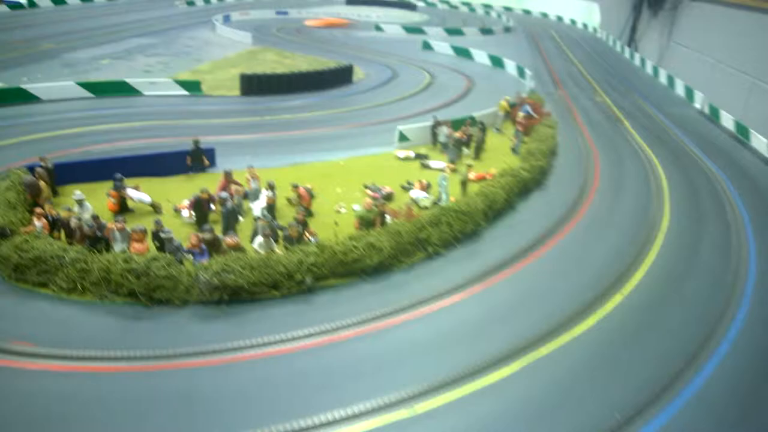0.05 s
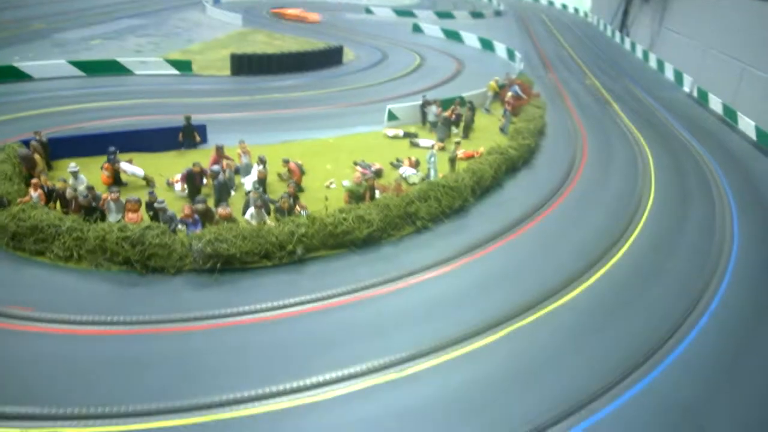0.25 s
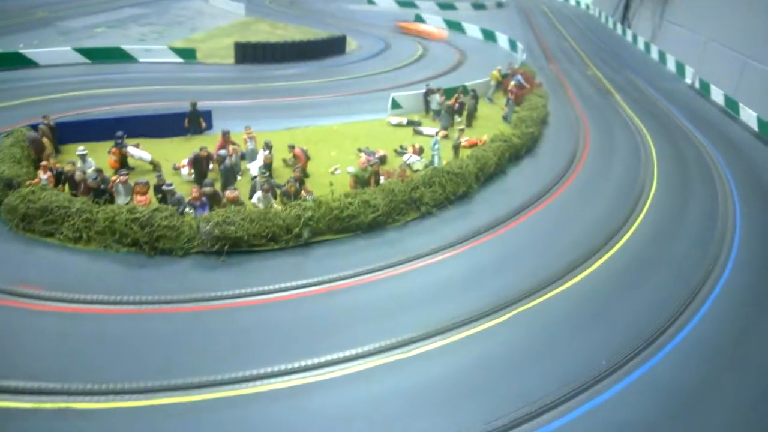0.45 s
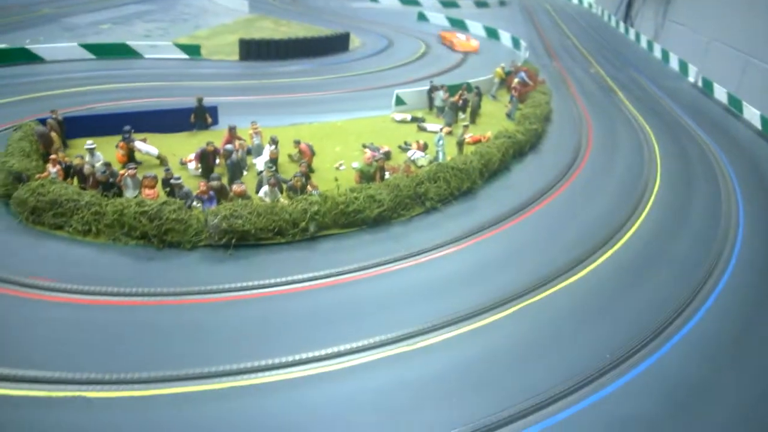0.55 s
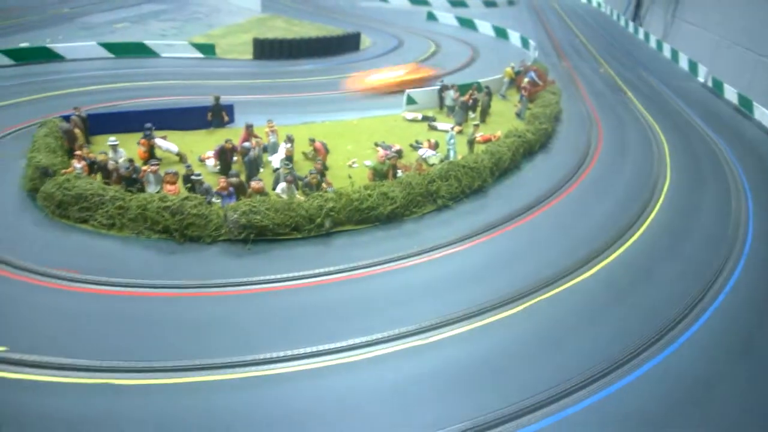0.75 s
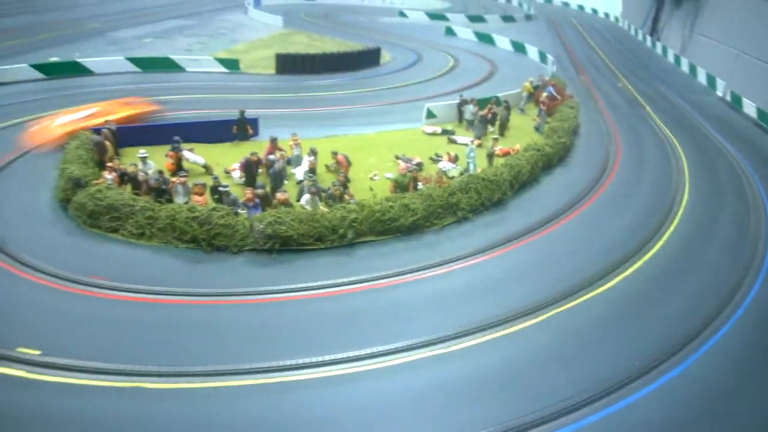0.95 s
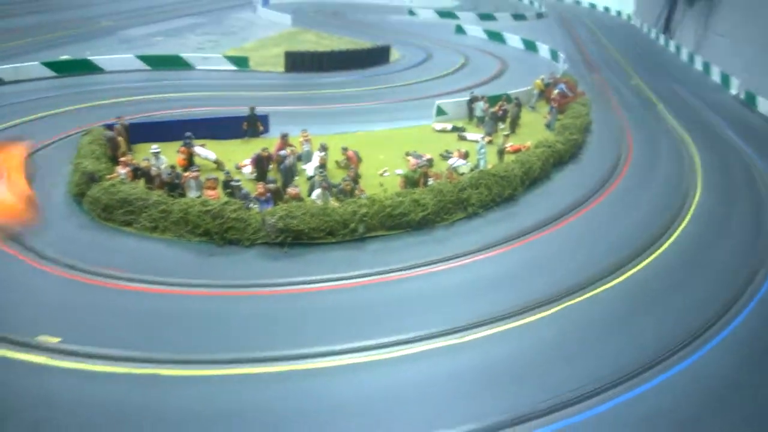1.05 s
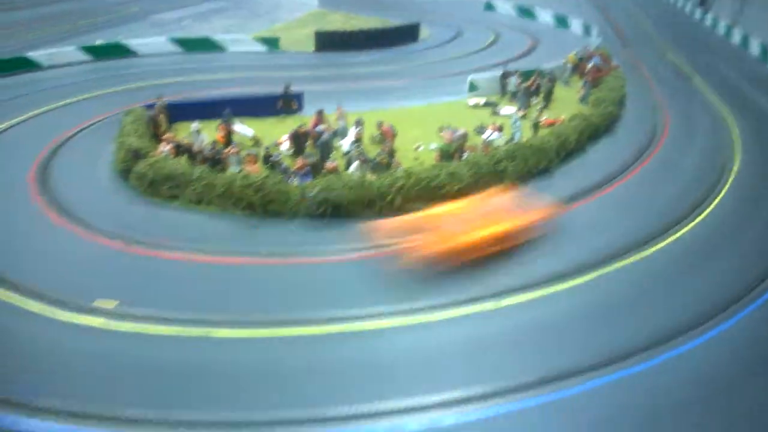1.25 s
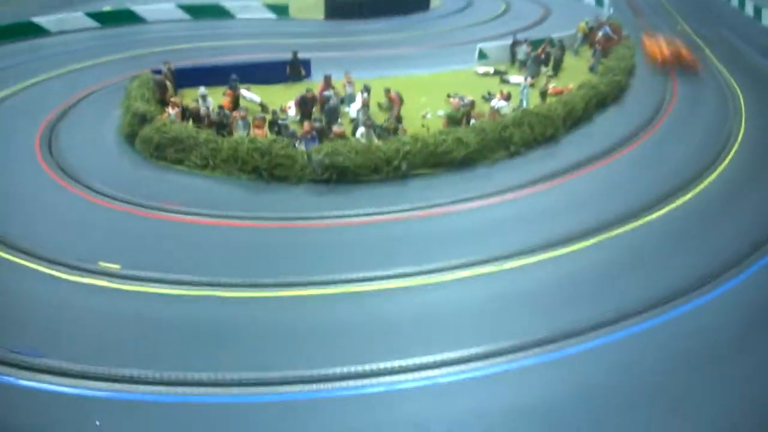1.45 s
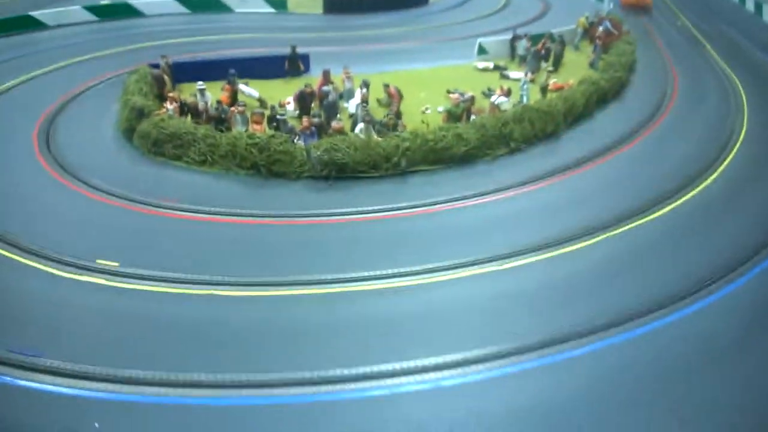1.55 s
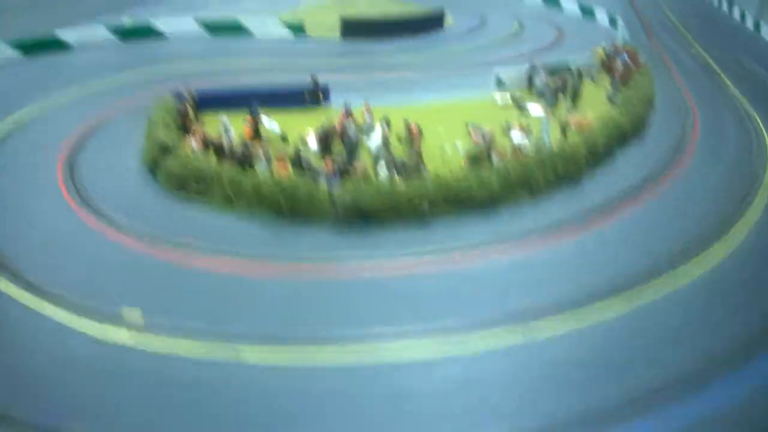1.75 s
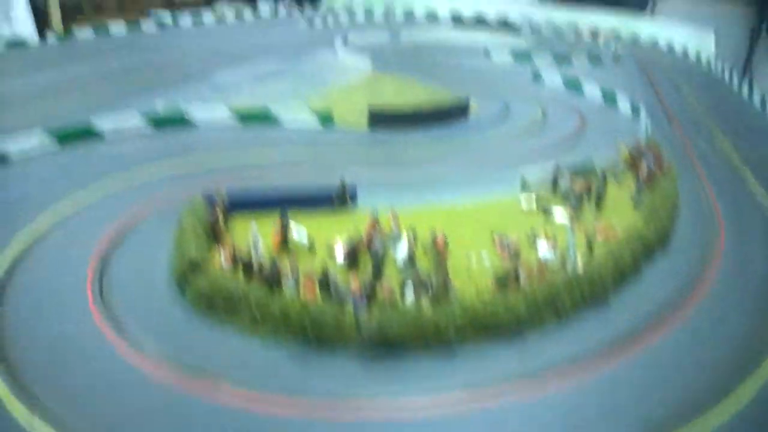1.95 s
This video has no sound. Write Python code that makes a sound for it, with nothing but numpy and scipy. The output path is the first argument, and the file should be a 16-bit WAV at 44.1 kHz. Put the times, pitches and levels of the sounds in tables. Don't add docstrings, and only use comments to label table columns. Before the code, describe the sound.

A toy slot car whirs around a model track in a hall, dry rasp and joint knocks first, then a rising gear whine rushing close past a single mono microphone before dropping away over faint ventilation hum.

```python
import sys
import numpy as np
from scipy import signal
from scipy.fft import rfft, irfft
from scipy.io import wavfile
from scipy.ndimage import uniform_filter1d

SR = 44100
rng = np.random.default_rng(int(sys.argv[2]) if len(sys.argv) > 2 else 0)


def transcribe(u):
    v = np.clip(np.atleast_2d(u).T, -1, 1)
    q = np.round(v * 32767).astype(np.int16)
    wavfile.write(sys.argv[1], SR, q)


def invert_db(x):
    u = np.asarray(x, float) / 20
    return 10 ** u


N = 88200

# (time [s], mesh rate [Hz], whine [dB], overtones [dB], blur [Hz])
GEAR_MESH = [(0, 1550, -56, -64, 350), (.31, 1720, -47, -62, 300), (.4, 1285, -62, -45, 40),
             (.5, 1080, -52, -62, 50), (.555, 980, -64, -64, 50), (.61, 1070, -47, -42, 60),
             (.7, 1290, -47, -44, 70), (.88, 1450, -47, -46, 50), (.9, 1100, -51, -56, 90),
             (.98, 1060, -47, -44, 70), (1.05, 1290, -44, -44, 60), (1.18, 1380, -41, -42, 90),
             (1.36, 1720, -36, -46, 220), (1.47, 2100, -40, -50, 150), (1.67, 3200, -46, -56, 120),
             (1.685, 2660, -41, -58, 150), (1.78, 2105, -53, -52, 75), (2, 2030, -53, -46, 45)]
# (multiple, level [dB])
OVERTONES = [(2, 5), (3, -1.5), (4, -4.5), (5, -7), (6, -4)]
# (pitch [Hz], width [Hz], level [dB])
GEAR_PANELS = [(2200, 120, -13), (3400, 300, 0), (4150, 150, -4), (5150, 250, -3), (6750, 550, 0)]
# (time [s], nearness [dB], facing the microphone [dB], tyre slide [dB])
PASS_BY = [(0, -38, -8.5, -4.5), (.13, -45.5, -5, 4), (.22, -41, -10.5, -1), (.41, -41, -3.5, 4),
           (.455, -47, -2, -1), (.575, -48.5, 4.5, -2.5), (.62, -39, -7, 0.5), (.78, -40.5, -2, 1),
           (.84, -44.5, 13, 7), (.89, -44, 0, 4), (.96, -45.5, -2, 7.5), (1.08, -34.5, -19, 4),
           (1.18, -34.5, -4, 8), (1.3, -29, 2, -2.5), (1.4, -24.5, -12, -2.5), (1.62, -31.5, -10.5, -0.5),
           (1.7, -39.5, -7, 2), (1.79, -41.5, -1.5, -3.5)]
# (pitch [Hz], width [Hz], level [dB])
SHELL_MODES = [(3594, 1070, 2.5), (6400, 1100, 4.5), (9050, 570, -5), (10630, 230, -20),
               (12600, 270, -11.5)]
# (frequency [Hz], density [dB per Hz])
BRAID_FIZZ = [(6000, -12.5), (8000, -2.5), (9000, -6), (10200, -0.5), (12000, 5), (13300, 5.5), (14500, 8),
              (15700, -3.5)]
# (frequency [Hz], density [dB per Hz])
TYRE_RASP = [(200, -13), (700, -17.5), (1100, -1), (1750, 4.5), (2750, -1), (5100, 4), (8000, 1),
             (16000, -18.5)]
# (frequency [Hz], density [dB per Hz])
BOARD_ROLL = [(50, -21), (100, 4), (180, -3.5), (350, -7.5), (800, -12), (1500, -14), (3000, -13.5),
              (6000, -20)]
# (time [s], level [dB])
RUMBLE_SWELL = [(0, 0), (.2, 1.5), (.35, 3.5), (.5, -3), (.65, 5), (.83, -3), (1.1, 3), (1.35, 1), (1.6, 3),
                (1.85, 0.5), (2, -4)]
# (time [s], pitch ratio)
SHELL_TWIST = [(0, 0.99), (.45, 1.024), (.6, 0.98), (.84, 1.02), (1.1, 1.033), (1.3, 1.03), (1.62, 0.98),
               (1.72, 1.065), (2, 0.95)]
# (time [s], loss [dB], length [s])
LULLS = [(0.132, -1.5, 0.039), (0.203, -7, .03), (0.465, -7.5, 0.038), (0.533, -10, .02),
         (0.886, -2, 0.1), (1.658, -6.5, .03), (1.75, -6, 0.1), (1.862, -2, .13)]
# (time [s], level [dB], length [s])
JOINT_RATTLES = [(0.03, -40, 0.033), (0.188, -38, 0.024), (0.2357, -37, 0.013), (0.29, -33.5, 0.011),
                 (0.331, -39, 0.025), (0.374, -42.5, 0.011), (0.542, -57, 0.0074), (0.598, -42, 0.018),
                 (0.816, -48, .02), (1.033, -38, 0.031), (1.295, -28, 0.0065), (1.389, -30, 0.009),
                 (1.43, -28, 0.011), (1.49, -27, 0.013), (1.52, -31.5, 0.011), (1.751, -38.5, 0.03)]
# (time [s], level
# [dB], length [s], pitch [Hz])
BRIEF_RINGS = [(.033, -49, 0.022, 6500), (.14, -46, 0.027, 3840), (.192, -50, 0.017, 1860),
               (.2354, -41.5, 0.023, 1740), (.236, -40.5, 0.015, 7000), (.2927, -39.5, 0.0079, 1710),
               (.293, -42, 0.0074, 3900), (.3326, -41, 0.021, 1650), (.333, -45, 0.016, 6080),
               (.373, -42.5, 0.019, 3240), (.39, -50.5, 0.088, 5100), (.4, -48, 0.02, 3900),
               (.4, -48, 0.058, 6400), (.475, -47, .02, 6600), (.49, -57, 0.041, 3500),
               (.554, -50, 0.053, 6390), (.555, -54, 0.024, 11000), (.602, -43.5, .045, 3290),
               (.6085, -42, .015, 6290), (.675, -40, 0.026, 6550), (.71, -43.5, 0.063, 6550),
               (.805, -38, 0.016, 6930), (.825, -43.5, 0.051, 7050), (.98, -53, 0.041, 6800),
               (1.05, -37, 0.047, 6750), (1.085, -36, 0.022, 3800), (1.165, -36, 0.014, 3850),
               (1.17, -33.5, 0.017, 5200), (1.21, -33, 0.018, 4000), (1.217, -29.5, 0.037, 6600),
               (1.25, -36.5, 0.022, 7500), (1.255, -32, 0.028, 6000), (1.27, -38, 0.027, 4250),
               (1.297, -28, 0.016, 11500), (1.298, -33, 0.019, 6500), (1.318, -31, 0.017, 6200),
               (1.343, -34, 0.02, 3500), (1.382, -28, 0.0083, 3700), (1.413, -32, 0.013, 3950),
               (1.44, -28.5, 0.029, 6400), (1.483, -25.5, 0.015, 6450), (1.507, -39.5, 0.022, 2950),
               (1.535, -43, .03, 6300), (1.555, -37, 0.055, 3290), (1.57, -38, 0.024, 2650),
               (1.6, -39.5, 0.047, 5950), (1.625, -40.5, 0.06, 3180), (1.72, -43.5, 0.055, 3600),
               (1.76, -39.5, .025, 6300), (1.79, -53.5, 0.23, 3400)]
# (time [s], level [dB], pitch [Hz], length [s])
BOARD_THUMPS = [(0.041, -48.5, 172, 0.045), (0.218, -48.5, 112, 0.12), (0.334, -46.5, 610, 0.11),
                (0.352, -40.5, 147, 0.088), (0.381, -38, 265, 0.028), (0.384, -43.5, 1040, 0.026),
                (0.4, -50, 159, 0.064), (0.593, -57, 203, 0.14), (0.708, -48.5, 95, 0.081),
                (0.903, -48.5, 1010, 0.058), (1.468, -62, 130, 0.07), (1.541, -42.5, 264, 0.043),
                (1.575, -40, 830, 0.034), (1.501, -48.5, 804, 0.08), (1.603, -52, 298, 0.12),
                (1.675, -36.5, 1500, 0.016), (1.688, -42, 1130, 0.047), (1.698, -43, 142, 0.062),
                (1.727, -45.5, 340, 0.047)]
# (time [s], level [dB], length [s], pitch [Hz])
CHASSIS_DRONES = [(.64, -45.5, 0.14, 3590), (0.967, -46, 0.14, 2270), (1.098, -42.5, 0.13, 2620),
                  (1.203, -39.5, 0.13, 1580), (1.327, -34, 0.18, 3610), (1.617, -40, 0.043, 3180)]
# (pitch [Hz], level [dB], phase [turns])
VENT_HUM = [
    (41.8, -45.5, 0.61),
    (63, -62, 0.25),
    (123, -67.5, 0.041),
]
# (frequency [Hz], density [dB per Hz])
HALL_AIR = [(22, 8), (33, 8), (60, -6), (150, -10), (700, -24), (2000, -36), (6300, -40), (16000, -52)]


def curve(table, count):
    rows = np.array(table)
    return np.interp(np.arange(N) / SR, rows[:, 0], rows[:, count])


def evened(x):
    return x / np.sqrt(np.mean(x ** 2) + 1e-20)


def coloured(x, points):
    hz = np.fft.rfftfreq(N, 1 / SR)
    f, db = np.transpose(points)
    gain = invert_db(np.interp(np.log(hz + 1), np.log(f + 1), db))
    return evened(irfft(rfft(x) * gain, N))


def drift(size):
    smooth = uniform_filter1d(rng.standard_normal(N), size)
    return evened(uniform_filter1d(smooth, size))


def resonate(x, hz, width):
    turn = np.exp(2j * np.pi * np.cumsum(hz * np.ones(len(x))) / SR)
    r = np.exp(-np.pi * abs(width) / SR)
    return 2 * (turn * signal.lfilter([(1 - r) ** 2], [1, -2 * r, r * r], x / turn)).real


def burst(start, length):
    u = (np.arange(N) / SR - start) / length
    return np.clip(u * 8, 0, 1) * np.exp(-2.5 * np.clip(u - .5, 0, 50))


def whine():
    teeth, wobble, clean = 10, .4, .25
    whine_db, chatter_db, skip_db = -2, 3.5, 4
    hz = curve(GEAR_MESH, count=1)
    blur = abs(curve(GEAR_MESH, count=4))
    turns = np.cumsum(hz * (1 + 0.0065 * drift(size=150))) / SR
    out = np.zeros(N)
    for order, db in [(1, 0), *OVERTONES]:
        k = round(order)
        jitter = np.cumsum(.5 * blur * drift(size=80)) / SR
        fuzzy = np.sqrt(2) * np.cos(2 * np.pi * k * (turns + jitter))
        fuzzy = fuzzy * invert_db(chatter_db * drift(size=250))
        line = np.sqrt(2) * np.cos(2 * np.pi * k * turns) * invert_db(skip_db * drift(size=600))
        line = line * np.minimum(50 / blur, 1) ** 2
        if k == 1:
            gain = invert_db(curve(GEAR_MESH, count=2))
        else:
            shell = sum(invert_db(d) / (1 + (2 * (k * hz - f) / (2.8 * w)) ** 4) for f, w, d in GEAR_PANELS)
            gain = invert_db(db + curve(GEAR_MESH, count=3)) * shell
        out += gain * (clean * line + (1 - clean) * fuzzy)
    return invert_db(whine_db) * out * (1 + wobble * np.cos(2 * np.pi * turns / teeth))


def rasp():
    slide_db, shell_db, fizz_db, rumble_db = -6, -7.5, 0.5, -50.5
    grit_per_s, grit_db, wander_hz = 2500, 3, 130
    flutter_db, patch_db, lumps_db = 1.4, 1, 1.5
    lull_share = 0.38

    grit = invert_db(grit_db * np.minimum(rng.exponential(1, N), 3)) * (rng.random(N) < grit_per_s / SR)
    grains = evened(grit * rng.standard_normal(N))
    drive = evened(grains + 2.3 * rng.standard_normal(N))

    level = invert_db(curve(PASS_BY, count=1) + lull_share * lull_loss() + flutter_db * drift(size=250))
    jolts = sum((invert_db(db) * burst(s, n)) ** 2 for s, db, n in JOINT_RATTLES)
    level = np.sqrt(level ** 2 + jolts)

    twist = curve(SHELL_TWIST, count=1)
    ring = np.zeros(N)
    for f, width, db in SHELL_MODES:
        mode = evened(resonate(drive, f * twist + wander_hz * drift(size=700), width))
        ring += invert_db(db + patch_db * drift(size=400)) * mode
    shell = invert_db(shell_db) * evened(ring)
    fizz = invert_db(fizz_db + curve(PASS_BY, count=2)) * coloured(drive, BRAID_FIZZ)
    slide = invert_db(slide_db + curve(PASS_BY, count=3)) * coloured(drive, TYRE_RASP)

    rumble_level = invert_db(rumble_db + curve(RUMBLE_SWELL, count=1) + lumps_db * drift(size=1500))
    rumble = rumble_level * coloured(rng.standard_normal(N), BOARD_ROLL)
    return mottled(level * (shell + slide + fizz)) + rumble


def lull_loss():
    t = np.arange(N) / SR
    edge_s = 0.0032
    return sum(db * np.clip(np.minimum(t - s, s + n - t) / edge_s, 0, 1) for s, db, n in LULLS)


def mottled(x):
    dull_hz, dull_share, mottle_db = 12500, 0.99, 2
    hz, t, z = signal.stft(x, SR, nperseg=512, noverlap=384)
    patches = uniform_filter1d(rng.standard_normal(z.shape), size=6, axis=0)
    patches = evened(uniform_filter1d(patches, size=14, axis=1))
    seconds = np.arange(N) / SR
    near_db = np.interp(t, seconds, curve(PASS_BY, count=1)) + 36
    loss_db = dull_share * np.minimum(near_db, 0) + np.interp(t, seconds, lull_loss())
    dull_db = loss_db / (1 + (dull_hz / (hz[:, None] + 1)) ** 16)
    return signal.istft(z * invert_db(mottle_db * patches + dull_db), SR, nperseg=512, noverlap=384)[1][:N]


def rings():
    ring_db, width_hz, pure, waver_hz = 4.5, 480, .55, 60
    noise = rng.standard_normal(N)
    waver = waver_hz * drift(size=120)
    out = np.zeros(N)
    for s, db, n, hz in BRIEF_RINGS:
        part = slice(round(s * SR), min(round((s + 4 * n) * SR), N))
        tone = np.sqrt(2) * np.sin(2 * np.pi * np.cumsum(hz + waver[part]) / SR)
        fuzz = evened(resonate(noise[part], hz, width_hz))
        out[part] += invert_db(db + ring_db) * burst(s, n)[part] * (pure * tone + (1 - pure) * fuzz)
    return out


def thumps():
    noise = rng.standard_normal(N)
    return sum(invert_db(db) * burst(s, n) * evened(resonate(noise, hz, 0.94 * hz))
               for s, db, hz, n in BOARD_THUMPS)


def drones():
    noise = rng.standard_normal(N)
    q = 7.6
    return sum(invert_db(db) * burst(s, n) * evened(resonate(noise, hz, hz / q))
               for s, db, n, hz in CHASSIS_DRONES)


def room(x):
    t60_s, top_hz = .18, 6000
    t = np.arange(SR // 2) / SR
    tail = rng.standard_normal(len(t)) * invert_db(-60 * t / t60_s) * (t > .006)
    tail = signal.lfilter(*signal.butter(1, top_hz, fs=SR), tail)
    return signal.fftconvolve(x, tail / np.linalg.norm(tail))[:N]


def hall():
    air_db, swell_db, waver_hz = -56, 1.5, .7
    t = np.arange(N) / SR
    slip = np.cumsum(waver_hz * drift(size=4000)) / SR
    lowest_hz = VENT_HUM[0][0]
    hum = sum(invert_db(db) * np.sqrt(2) * np.sin(2 * np.pi * (hz * t + phase + slip * hz / lowest_hz))
              for hz, db, phase in VENT_HUM)
    air = invert_db(air_db + drift(size=2000)) * coloured(rng.standard_normal(N), HALL_AIR)
    return hum * invert_db(swell_db * drift(size=2500)) + air


def scene():
    car = whine() + rasp() + rings() + thumps()
    mono = car + invert_db(-15) * room(car) + hall() + drones()
    return np.array([mono, mono])


def band_limit(x):
    return signal.sosfilt(signal.butter(12, 16520, fs=SR, output="sos"), x)


def record(dry):
    edge = signal.firwin(801, 15700, window=("kaiser", 10), fs=SR)[None]
    mix = signal.oaconvolve(dry, edge, "same")
    return band_limit(mix)


dry = scene()
out = record(dry)
transcribe(out)
```